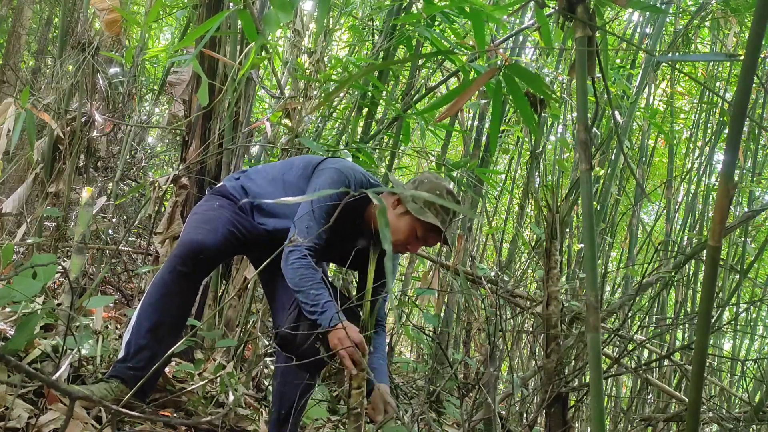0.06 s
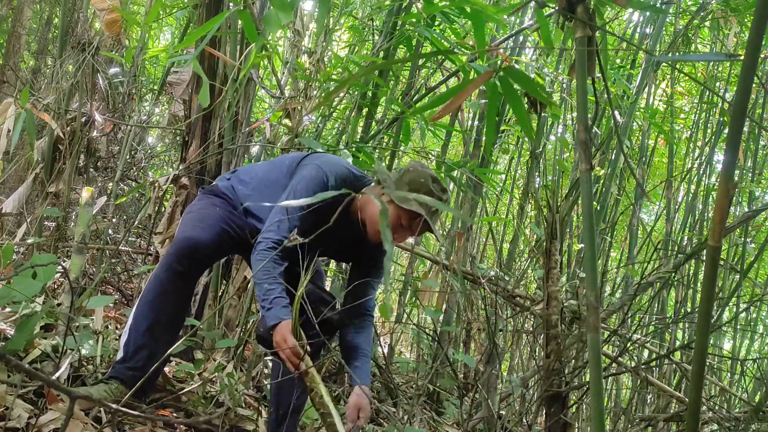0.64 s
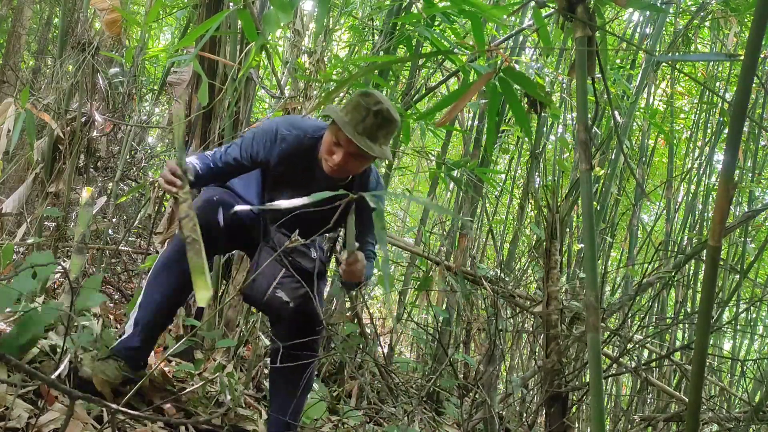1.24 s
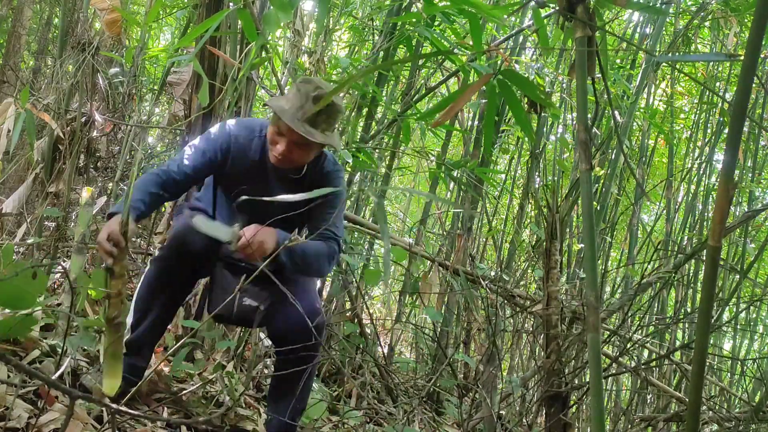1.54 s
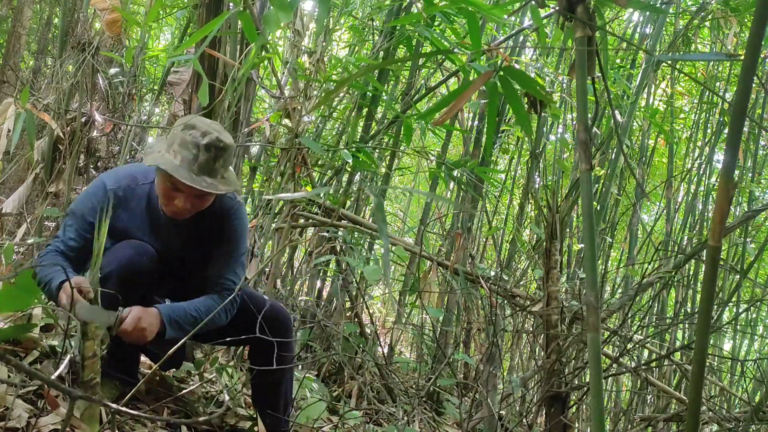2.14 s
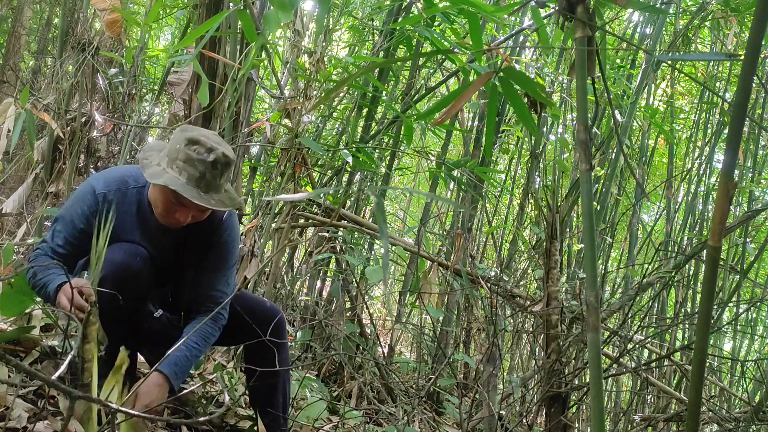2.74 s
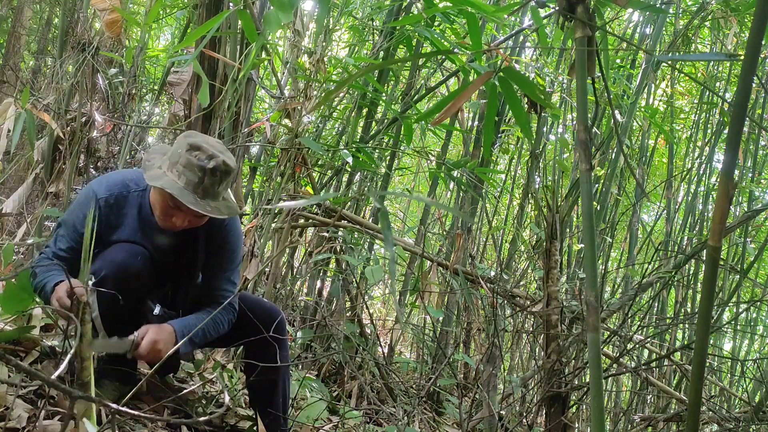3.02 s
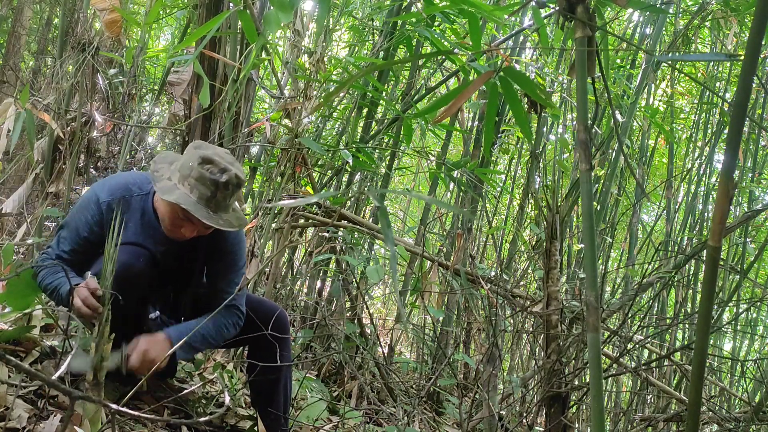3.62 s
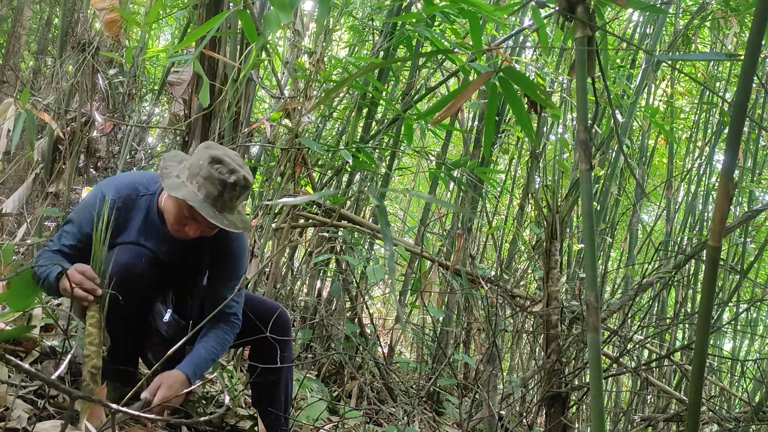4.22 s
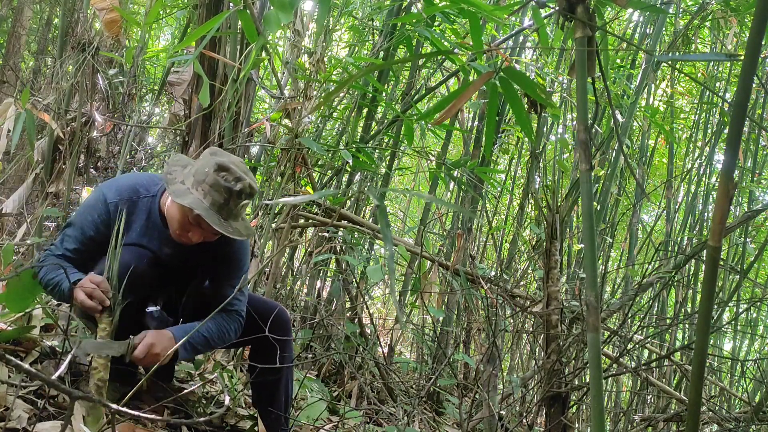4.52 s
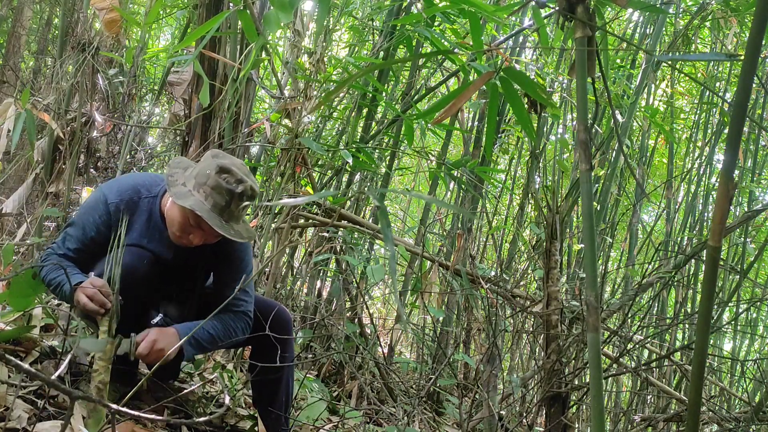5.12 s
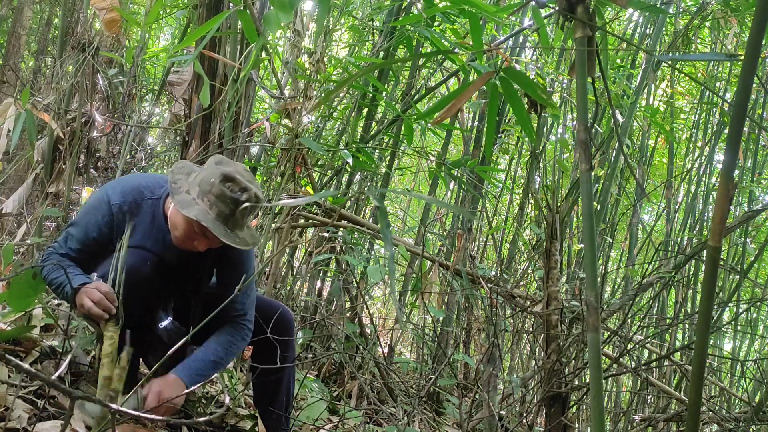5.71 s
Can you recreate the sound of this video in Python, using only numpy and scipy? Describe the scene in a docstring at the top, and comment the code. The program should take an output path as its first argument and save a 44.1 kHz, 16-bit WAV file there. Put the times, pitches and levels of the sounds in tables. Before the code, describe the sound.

A faint, even forest hiss and a light crackle of dry leaves run throughout. At about 0.5 seconds a bamboo shoot creaks briefly and breaks off with a loud, sharp crack, a dull thud and a quick run of splintering snaps. Faint husk squeaks follow around 0.8 seconds, and leaves rustle until 1.5 seconds as it is lifted. Its base knocks lightly on the ground near 1.8 seconds. From 2 to 2.8 seconds a knife makes four quick, crisp, slightly hollow cuts through the fibres, then four more between 3.3 and 4 seconds. Soft rustling and small ticks fill a lull until 5.1 seconds, when another run of cuts and cracks continues to about 5.8 seconds. Loose husk brushes after each stroke. The work is a few metres from a phone microphone, slightly left, and the thicket gives each crack a short, bright tail.

```python
"""Dry leaves rustle and a bamboo shoot cracks off at the ground; it is lifted, then trimmed with a knife.
Each quick stroke fractures a run of crisp fibres, whose impulses excite the hollow shoot and its soft butt.
Husks squeak, tick and brush between the strokes. The culms of the thicket scatter the sound into a
bright tail, over a faint forest hiss, a few metres from a phone with two microphone ports."""
import sys
import numpy as np
from scipy import signal
from scipy.fft import rfft, irfft
from scipy.io import wavfile
from scipy.ndimage import uniform_filter1d, map_coordinates

SR = 44100
rng = np.random.default_rng(int(sys.argv[2]) if len(sys.argv) > 2 else 0)


def output_pcm(signal):
    """Save a mono or channel-first signal as 16-bit PCM at the path in sys.argv[1].

    Samples are clipped to [-1, 1] before scaling.
    """
    pcm = np.clip(np.atleast_2d(signal).T, -1, 1) * 32767
    wavfile.write(sys.argv[1], SR, np.round(pcm).astype(np.int16))


N = 258426

# Spectrum of the forest hiss. Each row: frequency in Hz, relative level in dB.
FOREST_SPECTRUM = [(12, -32), (28, 26.5), (40, 14.5), (60, 18.5), (120, 5), (250, 2.5), (600, -4.5),
                   (1200, -8.5), (2000, -10), (4000, -12.5), (8000, -10.5), (15000, -10.5)]
# Likeness of that hiss at the two ports. Each row: frequency in Hz, correlation.
FOREST_CORRELATION = [(40, -0.12), (200, 0.12), (600, 0.38), (1200, -0.85), (2500, 1), (5000, -0.019)]
# Reverberation of the thicket. Each row: band centre in Hz, 60 dB decay time in seconds, gain in dB.
THICKET_BANDS = [(200, 0.54, -23), (600, 0.5, -10.5), (1500, 1, -17), (3700, 0.24, -9.5),
                 (6470, 0.34, -6.5), (9100, 0.18, -7), (14800, 0.27, -2)]
# A body moves through dry leaves. Each row: start and length in seconds, relative level in dB,
# woody ring in dB above that level.
LEAF_SWELLS = [(0.257, 0.053, -51.5, -0.5), (0.297, 0.077, -55, 0.5), (0.502, 0.37, -50, -13.5),
               (.64, 0.025, -52, 0), (0.93, 0.3, -57, -2.5), (1.196, 0.15, -53.5, -4),
               (1.29, 0.27, -57.5, -0.5), (2.93, 0.1, -60, -6), (4.117, 0.082, -54, -4),
               (4.16, 0.25, -63.5, -3.5), (5.2, 0.057, -54, -18), (5.413, 0.053, -47, -12.5),
               (5.606, 0.17, -49.5, -18)]
# The shoot is worked loose. Each row: start and length in seconds, first and last pitch in Hz, level in dB.
HUSK_GLIDES = [(0.72, 0.058, 331, 137, -58), (0.751, 0.068, 1298, 1560, -59),
               (0.827, 0.051, 1564, 1230, -64)]
# Cracks of stalk, husk and twig; the row at 1.7812 joins the butt's knock on the ground. Each row: start in
# seconds, relative level, cavity gain, thud gain in dB.
SINGLE_CRACKS = [ (.102, -62, 10.5, 7.5), (.5208, -27.5, -14, -30), (.531, -33, -5, -32),
                 (0.541, -30.5, -5.5, -32), (.5515, -27, 0, -19), (.629, -31, -2, -14),
                 (0.6648, -36, 4, -20), (0.7785, -39, -4.5, -30), (1.060, -44.5, -14, -13),
                 (1.7812, -40.5, 3, -14), (2.054, -29, -16, -28), (2.068, -29, -17, -36),
                 (2.081, -29, -29, -31), (2.217, -41.5, -13, -25), (2.355, -42, -9, -9),
                 (2.567, -37, 1, -17), (2.587, -39, -10, -15), (3.426, -46.5, -14, -29),
                 (3.499, -31, -26, -38), (3.928, -26, -14, -17), (4.609, -49, -12, -14),
                 (4.686, -47, -21, -38), (4.979, -47.5, -5, -29), (5.175, -32.5, -22, -21),
                 (5.3208, -37, -5, -26), (5.3396, -33, -15, -10), (5.41, -39.5, -1.5, -18),
                 (5.439, -40.5, -12, -25), (5.635, -41, 3.5, -20), ]
# Knife strokes. Each row: start and length in seconds, relative level in dB, change over the stroke in dB,
# cavity gain in dB, length of the scrape before the bite in seconds.
KNIFE_STROKES = [ (2.045, 0.042, -35.5, -7.5, -9.5, 0.039), (2.2567, .021, -29, -5, -14, 0.013),
                 (2.474, 0.034, -29, -6.5, -14.5, 0.016), (2.718, 0.059, -24.5, -15, -13, 0.042),
                 (3.337, 0.018, -40, -1, -7, 0.014), (3.496, 0.042, -32, -10.5, -14, 0.0035),
                 (3.716, 0.034, -28.5, -22.5, -12.5, 0.0093), (3.923, 0.075, -30.5, -7, -14.5, 0.012),
                 (5.139, .039, -36.5, -3.5, -11, 0.004), (5.338, 0.017, -31, -8, -11.5, 0.017),
                 (5.505, 0.019, -40, -6, -4, 0.0027), (5.525, 0.026, -28.5, -4, -12, 0),
                 (5.7498, 0.071, -27, -18.5, -10.5, 0.0084), ]
# Spectra of bursting fibres and of the soft butt. Each row: frequency in Hz, relative level in dB.
FIBRE_SPECTRUM = [(300, -44), (1500, -17.5), (2600, -3), (3200, -3), (3900, 1), (5200, 0), (7000, 0.5),
                  (9000, -2), (12000, -4.5), (15200, -10.5)]
BUTT_SPECTRUM = [(50, -21), (130, -1), (230, -2), (380, -1), (600, 1.5), (850, 0.5), (1300, -1),
                 (3000, -42)]
# Bearing of the work. Each row: time in seconds, delay at the right port in milliseconds.
RIGHT_DELAY = [(0, 0.045), (.7, 0.055), (1.3, 0.14), (2, 0.2), (5.86, 0.19)]
# Responses of the microphone ports. Each row: frequency in Hz, gain in dB.
LEFT_RESPONSE = [(500, -2.5), (1100, -3), (2200, 2), (6500, 0.5), (7500, 3), (8400, 6), (9000, 3),
                 (9600, -3.5), (10500, -9), (11700, 0), (13000, -3.5)]
RIGHT_RESPONSE = [(500, -2.5), (1100, 0.5), (2200, 2), (6500, 2.5), (7500, 2.5), (8100, -10), (8800, -8),
                  (9600, -7), (10600, -6), (11600, -6), (13000, -4)]


def undb(db):
    """Decibels express an amplitude ratio logarithmically."""
    return 10 ** (np.asarray(db) / 20)


def spectrum_at(points, hz):
    """Interpolation of (Hz, value) points on a log-frequency axis."""
    f, value = np.transpose(points)
    return np.interp(np.log(np.maximum(hz, 1)), np.log(f), value)


def response(points, size=2048):
    """Minimum phase: folding the cepstrum turns (Hz, dB) points into a causal impulse response."""
    gain = undb(spectrum_at(points, np.fft.rfftfreq(size, 1 / SR)))
    cepstrum = irfft(np.log(gain))
    cepstrum[1:size // 2] *= 2
    cepstrum[size // 2 + 1:] = 0
    return irfft(np.exp(rfft(cepstrum)))


def convolve(x, h):
    """Linear filtering: each channel is convolved with an impulse response."""
    return signal.fftconvolve(np.atleast_2d(x), np.atleast_2d(h), axes=-1)[:, :N]


def colour(clicks, points):
    """A filter of unit energy shapes the spectrum of clicks and keeps their power."""
    h = response(points)
    return convolve(clicks, h / np.linalg.norm(h))[0]


def highpass(x, hz):
    """A first-order slope attenuates frequencies below the corner."""
    return signal.sosfilt(signal.butter(1, hz, "high", fs=SR, output="sos"), x)


def crackle(size, rate, spread_db):
    """Shot noise of unit power: random clicks, a few stronger than the rest."""
    strength = undb(spread_db * np.minimum(rng.exponential(size=size), 3.5))
    clicks = np.sign(rng.standard_normal(size)) * strength * (rng.random(size) < rate / SR)
    return clicks / np.sqrt(np.mean(clicks ** 2) + 1e-12)


def add(bus, s, sound):
    """Superposition: a sound joins the mix at s seconds."""
    i = max(int(s * SR), 0)
    bus[..., i:i + sound.shape[-1]] += sound[..., :max(N - i, 0)]


def drift(rate):
    """Smoothed random steps give a fluctuation with spread near 1."""
    step = int(SR / rate)
    return uniform_filter1d(np.repeat(rng.standard_normal(N // step + 1), step), step)[:N]


def forest(db=-59.5):
    """Partly correlated noise: the even hiss of far foliage and a low stir of air."""
    hz = np.fft.rfftfreq(N, 1 / SR)
    alike = np.clip(spectrum_at(FOREST_CORRELATION, hz), -1, 1)
    noise = rfft(rng.standard_normal((2, N))) * undb(spectrum_at(FOREST_SPECTRUM, hz))
    mid, side = noise * np.sqrt([1 + alike, 1 - alike])
    air = irfft([mid + side, mid - side], N)
    return air / air.std() * undb(db)


def sway(x, rate=5, depth_s=0.00024):
    """Delay modulation: the culms sway, so their echo paths wander and no pitch settles."""
    return np.array([map_coordinates(side, [np.arange(N) + depth_s * SR * drift(rate)]) for side in x])


def thicket(x, near_db=-7, near_s=0.0089):
    """Scattering: ground and near stalks return the treble at once; hundreds of culms answer later."""
    t = np.arange(SR) / SR
    hz = np.fft.rfftfreq(SR, 1 / SR)
    centres = [row[0] for row in THICKET_BANDS]
    echoes = rfft([crackle(SR, rate=3500, spread_db=1.8) for _ in range(2)])
    tail = 0
    for (_, t60, db), weights in zip(THICKET_BANDS, np.eye(len(centres))):
        fade = undb(-60 * t / t60) * (1 - np.exp(-t / 0.002))
        band = irfft(echoes * spectrum_at(np.transpose([centres, weights]), hz), SR)
        tail = tail + band * fade * undb(db) / np.linalg.norm(fade)
    near = np.array([crackle(SR, rate=6000, spread_db=0.31) for _ in range(2)]) * np.exp(-t / near_s)
    near = highpass(near / np.linalg.norm(near, axis=1, keepdims=True), hz=3000)
    return sway(convolve(x, tail)) + undb(near_db) * convolve(x, near)


def hollow(clicks, hz, q=3.9):
    """Resonance: a hollow body gathers the power of the clicks into one broad peak."""
    b, a = signal.iirpeak(hz, q, fs=SR)
    return signal.lfilter(b, a, clicks) / np.sqrt(b[0])


def cavity_hz(centre_hz=1706, scatter=0.01):
    """The natural frequency of the shoot's cavity shifts a little with the grip."""
    return centre_hz * (1 + scatter * rng.standard_normal())


def husk(clicks, decay_s=0.0009):
    """Damped vibration: each piece of husk splinters with its own brief, uneven ring."""
    t = np.arange(SR // 200) / SR
    ring = rng.standard_normal(len(t)) * np.exp(-t / decay_s)
    ring[0] = 8  # the direct click
    return signal.lfilter(ring / np.linalg.norm(ring), [1], clicks)


def burst(clicks, hollow_db, hollow_hz, thud_db):
    """Impulses excite four paths: fibre alike at both ports, fibre unalike, cavity and butt."""
    cavity = undb(hollow_db) * hollow(clicks[2], hollow_hz)
    return np.array([husk(clicks[0]), husk(clicks[1]), cavity, undb(thud_db) * clicks[3]])


def rustle(stir_db=-68, flicker_db=3.5, thud_db=-6, rise_share=0.39):
    """Incoherent sources add in power: dry leaves click in flurries that swell with each movement."""
    t = np.arange(N) / SR
    # loosened husk brushes after each stroke; columns as in LEAF_SWELLS
    peels = [(s + 0.057, 0.13, -56, -25) for s, *_ in KNIFE_STROKES]
    leaf, wood = undb(stir_db), undb(stir_db + 1.5)  # sleeves and litter never quite rest
    for s, length, db, wood_db in LEAF_SWELLS + peels:
        swell = undb(db) * np.sqrt(np.interp((t - s) / length, [0, rise_share, 1], [0, 1, 0]))
        leaf = np.hypot(leaf, swell)
        wood = np.hypot(wood, swell * undb(wood_db))
    clicks = np.array([crackle(N, rate=1800, spread_db=1.5) for _ in range(4)])
    clicks *= undb(flicker_db * drift(45))
    woody_ring = hollow(clicks[2] * wood, hz=1800, q=0.76)
    return np.array([clicks[0] * leaf, clicks[1] * leaf, woody_ring, clicks[3] * wood * undb(thud_db)])


def squeaks(waver=0.06):
    """Friction: wet husk slips on the stalk in short, wavering glides."""
    bus = np.zeros(N)
    for s, length, start_hz, end_hz, db in HUSK_GLIDES:
        size = int(length * SR)
        hz = np.geomspace(start_hz, end_hz, size) * (1 + waver * drift(217)[:size])
        envelope = undb(db) * np.sqrt(2 * np.hanning(size))
        add(bus, s, envelope * np.sin(2 * np.pi * np.cumsum(hz) / SR))
    return bus


def stump(s=0.456, start_hz=290, end_hz=170, db=-32, decay_s=0.0044):
    """Damped recoil: as the shoot breaks off, the stump gives a dull, sinking knock in the soil."""
    bus = np.zeros(N)
    t = np.arange(SR // 10) / SR
    hz = end_hz + (start_hz - end_hz) * np.exp(-t / (2 * decay_s))
    add(bus, s, undb(db) * np.exp(-t / decay_s) * np.sin(2 * np.pi * np.cumsum(hz) / SR))
    return bus


def snap(hollow_db, hollow_hz, thud_db, energy_s=0.0033, splinter_s=0.002):
    """Brittle fracture: one sharp impulse, then a few milliseconds of splintering."""
    t = np.arange(SR // 50) / SR
    clicks = np.array([crackle(len(t), rate=9000, spread_db=0.43) for _ in range(4)])
    clicks *= np.exp(-t / splinter_s)
    clicks[:, 0] = 4  # the opening crack
    clicks *= np.sqrt(energy_s * SR) / np.linalg.norm(clicks, axis=1, keepdims=True)
    return burst(clicks, hollow_db, hollow_hz, thud_db)


def snaps(knock_s=1.781):
    """Impulsive excitation: the butt knocks once on the ground; stalk and husk crack in the hand."""
    bus = np.zeros((4, N))
    add(bus, knock_s, undb(-47) * snap(hollow_db=7, hollow_hz=720, thud_db=-4))
    for s, db, hollow_db, thud_db in SINGLE_CRACKS:
        add(bus, s, undb(db) * snap(hollow_db, cavity_hz(), thud_db))
    return bus


def tearing(length, db, change_db, hollow_db, thud_db, deepen_db=0):
    """Progressive fracture: fibres burst densely, in a spurt at each layer of husk."""
    attack_s, release_s, bite_s, spurt_s = 0.00076, 0.003, 0.0014, 0.0009
    t = np.arange(SR // 5) / SR
    progress = np.minimum(t / length, 1)
    push = undb(db + change_db * progress)
    push *= (1 - np.exp(-t / attack_s)) * np.exp(-np.maximum(t - length, 0) / release_s)
    # the first bite through the taut husk is the hardest
    push *= 1 + undb(-5) * np.exp(-t / bite_s)
    # the layers give way at uneven steps
    layer_times = np.cumsum(rng.uniform(0.27, 2.1, len(t) // 50)) / 260
    since_layer = t - np.append(0, layer_times)[np.searchsorted(layer_times, t)]
    spurts = 1 + np.exp(-since_layer / spurt_s)
    spurts /= np.sqrt(np.mean(spurts ** 2))
    fibres = np.array([crackle(len(t), rate=6500, spread_db=0.4) for _ in range(4)])
    return burst(fibres * push * spurts, hollow_db, cavity_hz(), thud_db + deepen_db * progress)


def breaking(s=0.455, strain_s=0.046, crack_s=0.0043, tear_s=0.12):
    """Failure in bending: the shoot creaks ever louder, cracks through, and its last fibres tear."""
    bus = np.zeros((4, N))
    add(bus, s - strain_s, tearing(strain_s, db=-64.5, change_db=21.5, hollow_db=-4.5, thud_db=-13.5))
    add(bus, s, tearing(crack_s, db=-20.5, change_db=0, hollow_db=-4.5, thud_db=-13.5))
    add(bus, s + crack_s, tearing(tear_s, db=-33.5, change_db=-14.5, hollow_db=-13.5, thud_db=-23))
    return bus


def cuts(thud_db=-26.5, core_db_per_s=225):
    """Fracture under an edge: the blade scrapes, bites, and sounds the soft butt more as it sinks."""
    bus = np.zeros((4, N))
    for s, length, db, change_db, hollow_db, scrape_s in KNIFE_STROKES:
        if scrape_s > 0:
            scrape = tearing(scrape_s, db=-54.5, change_db=8, hollow_db=hollow_db, thud_db=thud_db)
            add(bus, s - scrape_s, scrape)
        add(bus, s, tearing(length, db, change_db, hollow_db, thud_db, core_db_per_s * length))
    return bus


def ports(x, lag_ms):
    """Path difference: sound reaches the right port a little after the left."""
    return np.array([x, map_coordinates(x, [np.arange(N) - lag_ms * SR / 1000])])


def scene():
    """Superposition of the direct sound of fibre, cavity and butt, its echoes and the forest hiss."""
    fibre, stray, cavity, butt = undb(-0.5) * (breaking() + cuts()) + undb(-2.5) * snaps() + undb(-2) * rustle()
    bright = colour(fibre, FIBRE_SPECTRUM) + cavity
    # the shortest waves leave the fibres in narrow beams, so each port hears its own share
    beams = highpass(colour(stray, FIBRE_SPECTRUM), hz=8000)
    low = colour(butt, BUTT_SPECTRUM) + squeaks() + stump()
    lag_ms = np.interp(np.arange(N) / SR, *np.transpose(RIGHT_DELAY))
    direct = ports(bright, lag_ms) + ports(beams, lag_ms) * [[1], [-1]] + ports(low, 0.92 * lag_ms)
    return direct + thicket(bright + low) + forest()


def record(dry, ceiling=0.45, top_hz=15300):
    """Transduction: each port colours the sound, saturation rounds the peaks, a low-pass cuts the top."""
    coloured = convolve(dry, [response(LEFT_RESPONSE), response(RIGHT_RESPONSE)])
    rounded = ceiling * np.tanh(coloured / ceiling)
    return signal.sosfilt(signal.ellip(8, 0.2, 70, top_hz, fs=SR, output="sos"), rounded)


dry = scene()
out = record(dry)
output_pcm(out)
```